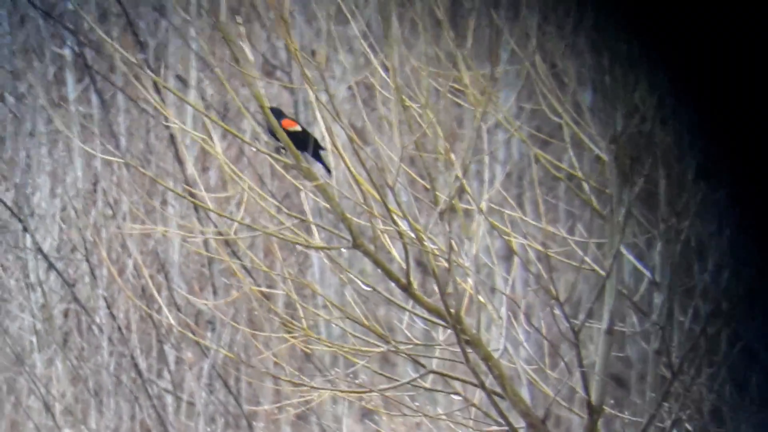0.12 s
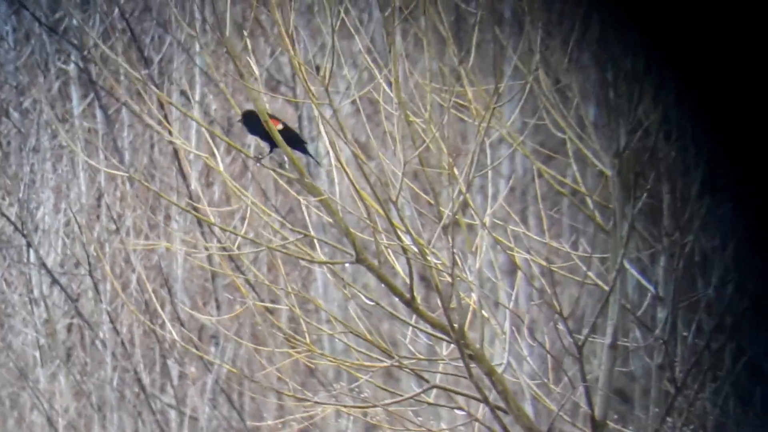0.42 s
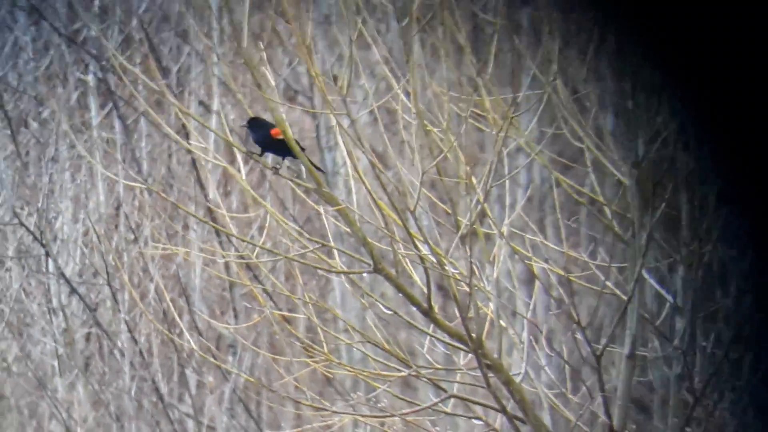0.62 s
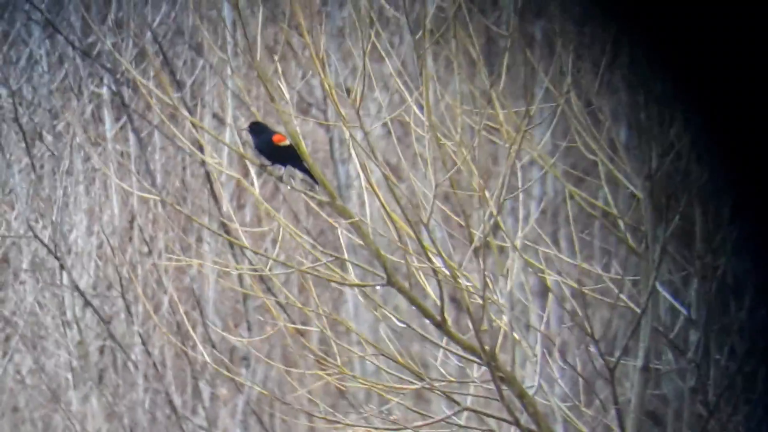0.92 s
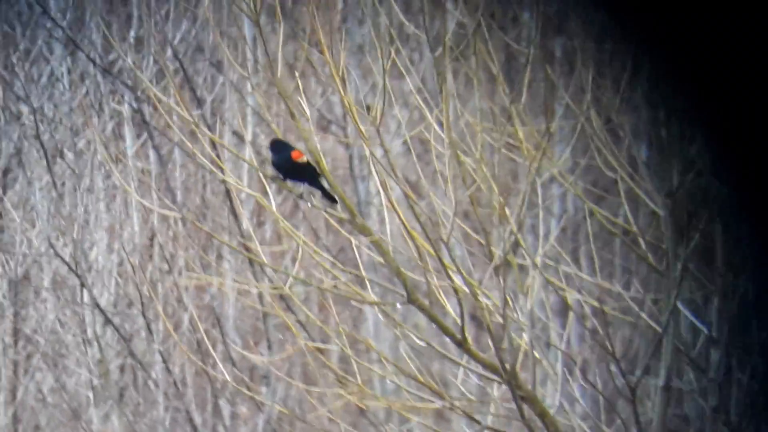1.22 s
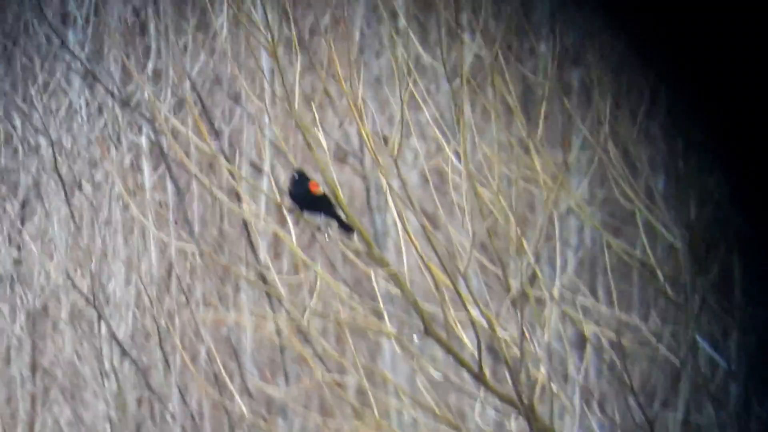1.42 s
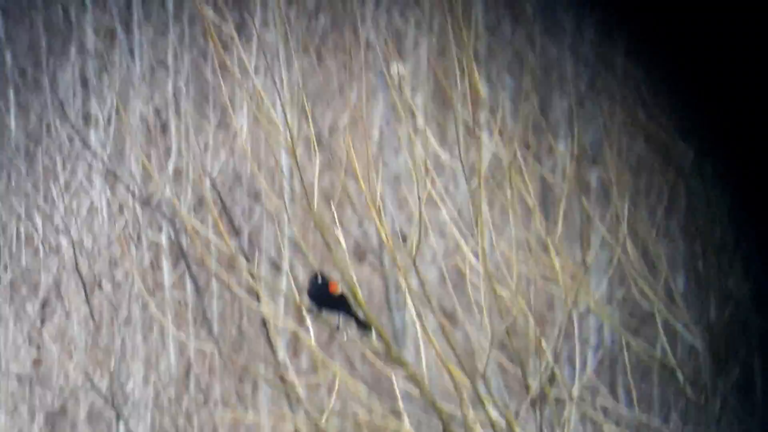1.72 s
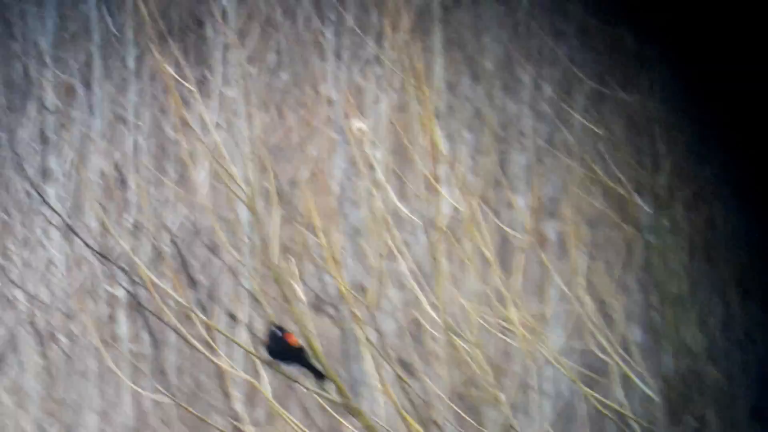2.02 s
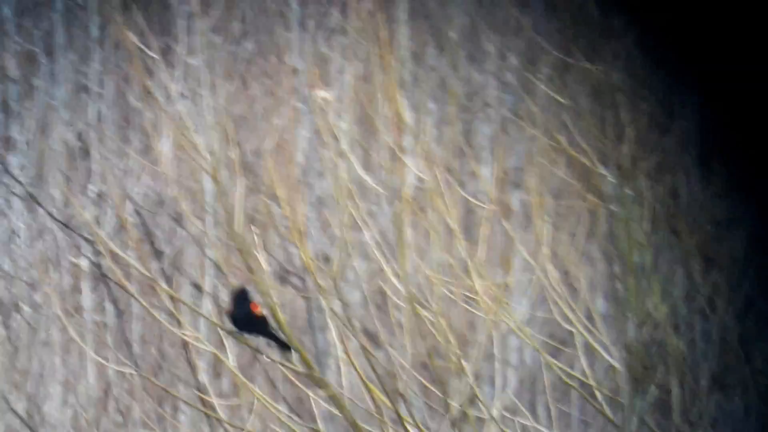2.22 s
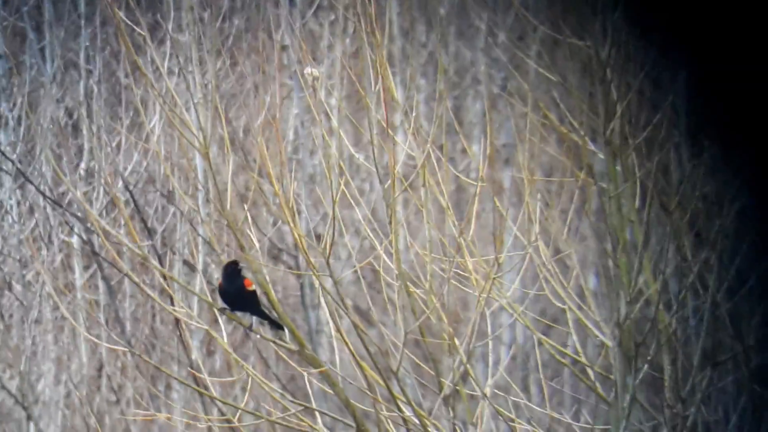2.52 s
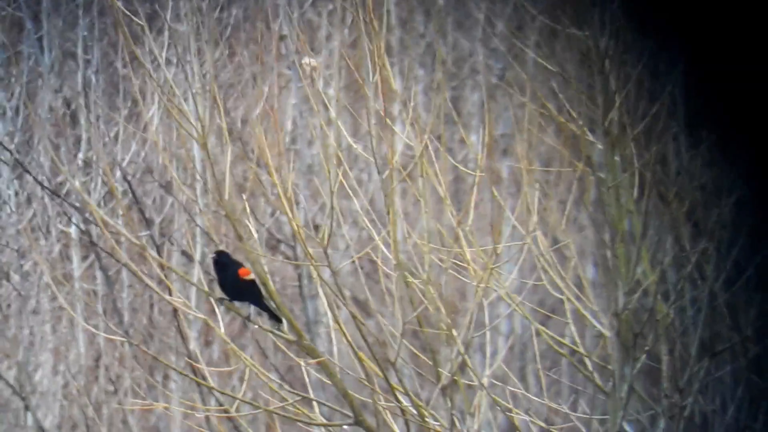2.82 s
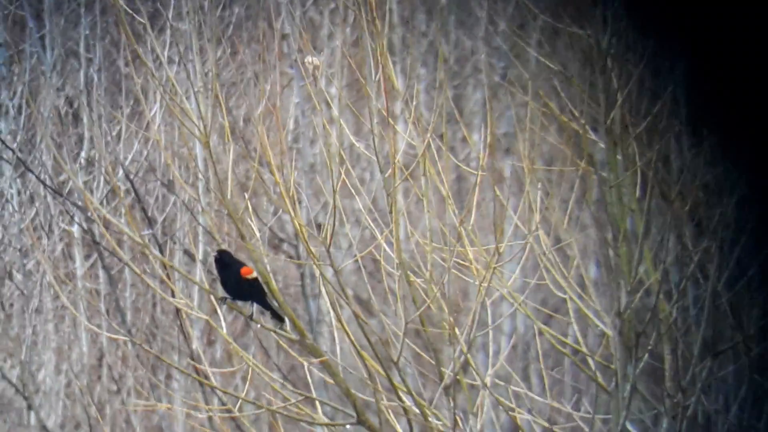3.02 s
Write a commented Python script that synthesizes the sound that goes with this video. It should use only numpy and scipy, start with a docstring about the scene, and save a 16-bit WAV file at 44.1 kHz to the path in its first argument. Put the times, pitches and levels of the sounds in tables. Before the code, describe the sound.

Marsh blackbird gives a few clipped notes, then a harsh rattling trill, amid ringing frog peeps.

```python
"""A marsh: a dense chorus of tree frogs, many short rising sine peeps near 2.8 kHz, rings on among the reeds.
A blackbird on the right sings short throbbing harmonic notes, one a buzz, then a trill of quick pitch strokes.
Small birds whistle and twitter in gliding sines, one near frog gives a low rising peep, and chips are noise
bursts, over a noise wash of far trills. Filtered noise makes a low rumble and a treble hiss underneath, and
something bumps the left microphone three times: low decaying sines with a burst of rumble."""
import sys
import numpy as np
from scipy import signal
from scipy.fft import rfft, irfft
from scipy.io import wavfile
from scipy.ndimage import uniform_filter1d

SR = 44100
rng = np.random.default_rng(int(sys.argv[2]) if len(sys.argv) > 2 else 0)


def dump_mix(stems):
    """Bounce the given channels to the path in sys.argv[1] as a 16-bit WAV at rate SR."""
    frames = np.atleast_2d(stems).T  # one column per channel
    limited = np.clip(frames, -1, 1)  # hard clip at full scale
    pcm = np.round(limited * 32767).astype(np.int16)
    wavfile.write(sys.argv[1], SR, pcm)


N = 138915
T = np.arange(N) / SR  # seconds

SONG_T60_S = 0.1  # echo decay shared by the blackbird and the small calls
FAINT_PAN_DB = -9  # left minus right, for the treble floor and the far trills


def undb(db):
    """Turn dB into an amplitude factor."""
    return 10 ** (np.asarray(db) / 20)


def curve(rows):
    """Straight lines through (seconds, value) rows."""
    return np.interp(T, *np.array(rows).T)


def colour(x, rows):
    """Filter by (Hz, dB) points, falling away past the ends."""
    hz, db = np.array(rows, float).T
    log_hz = np.log(np.arange(N // 2 + 1) * SR / N + 1)
    below = np.maximum(np.log(hz[0]) - log_hz, 0)
    above = np.maximum(log_hz - np.log(hz[-1]), 0)
    gain_db = np.interp(log_hz, np.log(hz), db) - 60 * (below + above)
    return irfft(rfft(x) * undb(gain_db), N)


def unit(x):
    """Bring the rms to 1."""
    return x / np.sqrt(np.mean(x ** 2))


def pan(x, db):
    """Place a sound by its level difference, left minus right."""
    return x * undb(np.array([[db], [-db]]) / 2)


def walk(rate):
    """Smoothed chance with about `rate` new values a second, spread 1."""
    k = int(SR / rate)
    steps = np.repeat(rng.standard_normal(N // k + 1), k)
    return unit(uniform_filter1d(uniform_filter1d(steps, k), k)[:N])


def add(out, start, x):
    """Mix x in at a time in seconds, cut at the ends."""
    i = int(start * SR)
    a, b = max(i, 0), min(i + x.shape[-1], N)
    if b > a:
        out[..., a:b] += x[..., a - i:b - i]


def phase(length, *hz):
    """Running phase of a glide through equally spaced pitches."""
    place = np.linspace(0, 1, int(length * SR))
    return 2 * np.pi * np.cumsum(np.interp(place, np.linspace(0, 1, len(hz)), hz)) / SR


def shape(x, edge):
    """Rounded attack and release, each a share `edge` of the length, with a sine's steady part lifted to rms 1."""
    u = np.linspace(0, 1, x.shape[-1])
    ramp = np.clip(np.minimum(u, 1 - u) / edge, 0, 1)
    return np.sqrt(2) * x * np.sin(np.pi / 2 * ramp) ** 2


def reeds(x, wet_db, t60):
    """Scattered echoes from reeds and branches: decaying noise, unrelated left and right."""
    t = T[:SR // 2]
    tail = rng.standard_normal((2, len(t))) * 1000 ** (-t / t60) * (t > .002)
    tail /= np.sqrt(np.sum(tail ** 2, axis=1, keepdims=True))
    return x + undb(wet_db) * signal.fftconvolve(x, tail, axes=1)[:, :N]


def air():
    """Far rumble, alike left and right in the bass, a faint treble floor and treble hiss, swelling in the trill."""
    # Colour of the rumble. Each row: frequency in Hz, relative level in dB per Hz.
    rumble_colour = [(12, -47.5), (20, -14.5), (38, -26), (64, -3), (135, -5), (219, -14), (371, -12.5),
                     (401, -16), (517, -16), (2100, -35.5), (2730, -76), (4620, -120)]
    # Swell of the bass about its mean. Each row: time in seconds, level in dB.
    bass_swell = [(0, -70.5), (.3, -61.5), (.7, -68), (1.0, -58), (1.2, -59), (1.45, -65), (1.75, -58.5),
                  (2.1, -70.5), (2.2, -62.5), (2.24, -55.5), (2.4, -68), (2.9, -63.5), (3.15, -62)]
    # Treble floor. Each row: frequency in Hz, level in dB per Hz before a 20 dB cut.
    treble_floor = [(2000, -93), (3300, -82.5), (5200, -119), (5700, -110), (7500, -118), (8500, -118)]
    # Colour of the hiss. Each row: frequency in Hz, relative level in dB per Hz.
    hiss_colour = [(4710, -30.5), (8000, -20), (9240, -11.5), (11900, -2), (13800, -3.5), (15500, -5.5)]
    # Course of the hiss. Each row: time in seconds, level in dB before a 3.5 dB lift.
    hiss_course = [(0.0, -89), (0.02, -84), (0.74, -85.5), (0.93, -81), (1.31, -83.5), (2.13, -79),
                   (2.44, -82.5), (3.14, -85), (3.15, -85)]
    rumble_db, gust_db = -57.5, 1

    alike = signal.butter(1, 146, fs=SR, output="sos")  # below 146 Hz left and right agree
    common, own = rng.standard_normal(N), rng.standard_normal((2, N))
    mixed = 1.354 * signal.sosfilt(alike, common) + own - 0.49 * signal.sosfilt(alike, own)
    low = unit(colour(mixed, rumble_colour))
    bass = signal.sosfilt(signal.butter(2, 130, fs=SR, output="sos"), low)
    swell = curve(bass_swell)
    low = low + bass * (undb(swell - swell.mean() + gust_db * walk(5.9)) - 1)

    # sqrt(SR / 2) turns white noise into level per Hz; the tenth is the 20 dB cut
    faint = colour(rng.standard_normal((2, N)), treble_floor) * np.sqrt(SR / 2) / 10
    hiss = unit(colour(rng.standard_normal((2, N)), hiss_colour))
    hiss = hiss * undb(curve(hiss_course) + 3.5 + 0.62 * walk(10))
    return pan(low, -1.5) * undb(rumble_db) + pan(faint, FAINT_PAN_DB) + pan(hiss, 0.28)


def bumps():
    """Knocks on the left: the housing rings in decaying low modes, pitch sagging after each knock."""
    # Each row: start in seconds, level in dB before a 10.5 dB lift, left minus right in dB.
    knocks = [(0.819, -34, 29), (1.628, -49.5, 45), (2.596, -50.5, 40)]
    # Ring of the housing. Each row: settled frequency in Hz, level in dB, 60 dB decay time in seconds.
    modes = [(125, 5.5, 0.098), (219.4, -13, 0.21), (366, -15, 0.17), (460, -15.5, 0.088),
             (493.5, -38, 0.17), (803, -57.5, 0.27)]
    sag, sag_s = 1.148, 0.00556  # extra pitch at the knock, as a share, and how fast it goes
    attack_s, rumble_db, rumble_t60_s = .004, -13, 0.47

    out, t = np.zeros((2, N)), T[:SR // 3]
    bent = t + sag * sag_s * (1 - np.exp(-t / sag_s))
    ring = sum(undb(db) * np.sin(2 * np.pi * hz * bent) * 1000 ** (-t / t60) for hz, db, t60 in modes)
    ring = ring * np.sin(np.pi / 2 * np.clip(t / attack_s, 0, 1)) ** 2
    for start, db, pan_db in knocks:
        rumble = colour(rng.standard_normal(N), [(25, -26), (90, 6.5), (160, -1), (300, -30)])
        rumble = unit(rumble)[:len(t)] * 1000 ** (-t / rumble_t60_s) * (1 - np.exp(-t / 0.03))
        shake = ring + undb(rumble_db) * rumble
        add(out, start - .001, shake * undb(db + 10.5 - np.array([[0], [pan_db]])))
    return out


def small_calls():
    """Gliding sine calls, twitters of rising chirps, noisy chip calls and a noise wash of far trills."""
    # Gliding whistles of small birds, and one low rising peep of a near frog (at .295 s).
    # Each row: start and length in seconds, start and end pitch in Hz, level in dB, left minus right in dB.
    glides = [(.005, 0.035, 5840, 5650, -79.5, -13), (.295, 0.087, 1396, 1594, -74, -9),
              (0.431, 0.083, 4460, 4390, -74, -12), (.39, .13, 4940, 5110, -78.5, -13),
              (0.604, .035, 4600, 4620, -80.5, -13), (0.813, 0.1, 4470, 4347, -71.5, -23),
              (0.915, 0.093, 4620, 4550, -68, -8), (1.009, 0.21, 1218, 1191, -74, -15.5),
              (1.232, .085, 4480, 4400, -64, -8), (1.295, .068, 4620, 4560, -62, -6),
              (1.42, .14, 7520, 7720, -88, -4), (2.925, 0.13, 4980, 5055, -83, -9.5),
              (3.064, 0.048, 2355, 2206, -70, -3), (1.708, 0.066, 4800, 4660, -68, 1)]
    # Each row: start in seconds, number of chirps, period in seconds, level of the third chirp in dB.
    twitters = [(.088, 6, 0.024, -65), (2.355, 7, 0.02, -61.5), (2.814, 4, .021, -68.5)]
    # Harsh calls. Each row: start and length in seconds, centre and width in Hz, level in dB.
    chips = [(0.329, 0.048, 4450, 1450, -60.5), (2.781, 0.028, 4060, 1220, -73)]
    # Far blackbird trills blurred to a wash. Each row: time in seconds, level in dB.
    wash_course = [(0, -70.5), (.1, -66), (.27, -70), (.3, -74), (.5, -76.5), (.7, -76.5), (1.2, -79),
                   (1.6, -79.5), (2.2, -66.5), (2.5, -78.5), (3.15, -84)]
    chirp_s, low_hz, high_hz = .018, 4250, 5450
    fade_db, twitter_pan_db = -4.5, -13  # fade for each chirp away from the third; left minus right

    out = np.zeros((2, N))
    for start, length, start_hz, end_hz, db, pan_db in glides:
        glide = shape(np.sin(phase(length, start_hz, end_hz)), 0.32)
        add(out, start, pan(glide * undb(db), pan_db))

    chirp = shape(np.sin(phase(chirp_s, low_hz, (low_hz + 2 * high_hz) / 3, high_hz)), 0.48)
    for start, count, period, db in twitters:
        for n in range(int(round(count))):
            add(out, start + n * period, pan(chirp * undb(db + fade_db * abs(n - 2)), twitter_pan_db))

    for start, length, hz, width, db in chips:
        band = [(hz - width, -12), (hz, 0), (hz + width / 2, -10), (hz + 2 * width, -40)]
        rasp = unit(colour(rng.standard_normal(N), band))[:int(length * SR)]
        add(out, start, pan(shape(rasp, 0.64) * undb(db), twitter_pan_db))

    wash_colour = [(3000, -23.5), (3500, 1.5), (4300, 1), (5000, 3.5), (5300, -7.5), (5600, -15.5)]
    wash = unit(colour(rng.standard_normal((2, N)), wash_colour)) * undb(curve(wash_course) + walk(40))
    return reeds(out, -10.5, SONG_T60_S) + pan(wash, FAINT_PAN_DB)


def frogs():
    """Many short sine peeps, each rising in pitch, at random times, pitches and places, ringing in the reeds."""
    # Course of the evened-out chorus. Each row: time in seconds, level in dB before a 3 dB lift.
    chorus_course = [(0.0, -55.5), (0.03, -55.5), (0.4, -51), (0.66, -55), (0.67, -51), (1.13, -52.5),
                     (1.15, -56), (1.24, -47), (1.26, -55), (1.37, -50), (1.64, -53.5), (1.75, -49.5),
                     (1.94, -54.5), (2.08, -46), (2.19, -52), (2.24, -49.5), (2.44, -55), (2.6, -50.5),
                     (2.74, -54), (2.78, -47.5), (2.8, -49.5), (2.96, -55), (3.11, -52.5), (3.15, -54)]
    count, peep_s, rise_hz_per_s, scatter_db = 600, .12, 2000, 3
    common_hz, spread_hz = 2819.6, 130
    edge_hz, edge_db = -20.25, -1  # frogs far from the common pitch lean lower and are fainter

    out = np.zeros((2, N))
    for n, (a, b, c, d, e) in enumerate(rng.standard_normal((count, 5))):
        length = peep_s * np.exp(.2 * a)
        hz = common_hz + spread_hz * b + edge_hz * b ** 2
        half_rise = rise_hz_per_s * length / 2
        ph = phase(length, hz - half_rise, hz + half_rise)
        # place e sets both the phase and the level between left and right
        peep = shape(np.array([np.sin(ph), np.sin(ph + 2.42 * e)]), 0.23)
        peep = peep * undb(scatter_db * c + edge_db * b ** 2) * undb(1.8 * e * np.array([[1], [-1]]))
        start = (n + 5 * d) / count * (T[-1] + 0.51) - .3
        add(out, start, peep)
    out = reeds(out, 4, 0.73)
    out = out / np.sqrt(uniform_filter1d(np.mean(out ** 2, axis=0), SR // 8))  # even out the level
    return pan(out, -6) * undb(curve(chorus_course) + 3.0)


def song_notes():
    """Harmonic notes whose voice is chopped by a second membrane and roughened by fast chance."""
    # Each row: start and length in seconds, start, middle and end pitch in Hz, level at the end before
    # overtones, throb and colour in dB, throb rate in Hz, throb depth 0-1.
    notes = [(1.197, 0.043, 1510, 1850, 1580, -49.5, 100, 0.2),
             (1.344, 0.054, 2318, 2187, 2257, -55, 97.5, 1),
             (1.432, .150, 1694, 1695, 1697, -46, 199.5, .7),
             (1.435, 0.14, 1510, 1552, 1594, -64, 96.4, 0.38),
             (1.598, .026, 1950, 1900, 1830, -54.5, 100, .1),
             (1.632, 0.024, 1600, 1656, 1745, -35, 100, 0.2)]
    # One row per note: levels of multiples 1, 2, 3 and 4 of its pitch in dB.
    overtones = [(-24.5, -1.5, -14, -23), (15.5, -20, -2, -30), (-8, -5, -3, -7), (19.5, -35, -34, -34),
                 (26.5, -45, -4, -34), (-39, -7, -22, -13)]
    swell_db, rasp_db, waver = 10.5, -4, .004  # rise over the note, roughness, pitch waver as a share

    out = np.zeros(N)
    for (start, length, a, b, c, db, throb_hz, depth), tones in zip(notes, overtones):
        ph = phase(length, a, (a + 2 * b) / 3, b, (c + 2 * b) / 3, c)
        ph = ph + waver * np.cumsum(walk(150)[:len(ph)] * np.gradient(ph))
        voice = sum(undb(g) * np.exp(1j * (k + 1) * ph) for k, g in enumerate(tones))
        # the throb's side lines all lie below each overtone
        beat = np.exp(-1j * phase(length, throb_hz, throb_hz))
        side = depth * beat / (1 - 0.67 * beat)
        rasp = depth * undb(rasp_db) * walk(1500)[:len(ph)]
        note = shape((voice * (1 + side + rasp)).imag, 0.18)
        add(out, start, note * undb(db + swell_db * np.linspace(-1, 0, len(ph))))
    return out


def stroke(pitch, up_s):
    """One trill stroke: a sweep up in pitch, fainter, and a steeper one down."""
    top_hz, up_hz_per_s, down_hz_per_s, down_s = 5800, 4e5, 8e5, .0045
    t = np.arange(-up_s, down_s, 1 / SR)
    hz = top_hz * pitch + np.where(t < 0, up_hz_per_s, -down_hz_per_s) * t
    hz = uniform_filter1d(hz, size=40)  # round the peak
    sweep = shape(np.sin(2 * np.pi * np.cumsum(hz) / SR), 0.32)
    return undb(np.interp(t, [-.001, .001], [-5, 0])) * sweep


def song_trill():
    """Syllables of a few fading strokes over a noise rasp, the first ones closer together."""
    # Strokes of one syllable. Each row: delay in seconds, share of the top pitch, level in dB.
    strokes = [(0, 1, 0), (.005, .88, -4), (.0095, .88, -11), (.014, .8, -12)]
    # Course of the trill before colour. Each row: time in seconds, level in dB.
    trill_course = [(1.65, -43), (1.70, -39), (1.9, -38.5), (2.1, -39.5), (2.17, -42.5), (2.21, -43)]
    start_s, count, period_s = 1.661, 27, .0208
    hurry_s, settle = .018, 3.6  # total time gained early on; syllables it takes to settle
    up_s, scatter_db, rasp_db = .004, 1.2, -3.5

    trill = np.zeros(N)
    for n, chance in enumerate(rng.standard_normal((count, len(strokes), 3))):
        start = start_s + n * period_s - hurry_s * (1 - np.exp(-n / settle)) - up_s
        for (delay, pitch, db), (a, b, c) in zip(strokes, chance):
            sweep = stroke(pitch + .012 * a, up_s) * undb(db + scatter_db * b)
            add(trill, start + delay * (1 + 0.066 * c), sweep)
    length = count * period_s - hurry_s
    rasp = shape(rng.standard_normal(int(length * SR)), .03)
    add(trill, start_s - .01, rasp * undb(rasp_db))
    return trill * undb(curve(trill_course))


def blackbird():
    """Notes and trill coloured for each microphone, with short echoes."""
    # Colour at the right microphone. Each row: frequency in Hz, gain in dB.
    right_colour = [(1200, -19.5), (1900, -24.5), (2300, -12), (2800, 8), (3250, -8.5), (3500, -5.5),
                    (4100, -4), (4270, -13), (4500, -3), (5000, 2), (5600, -3.5), (6100, -32),
                    (6500, -25.5), (6900, -32), (7250, -74), (7500, -40), (8500, -62)]
    # Left minus right. Each row: frequency in Hz, difference in dB.
    left_difference = [(1200, -10), (2200, -2.5), (3600, -20), (4500, -27.5), (5000, -24.5), (5500, -24),
                       (6600, 3), (8500, -1)]
    right = colour(song_notes() + song_trill(), right_colour)
    left = colour(right, left_difference)
    return reeds(np.array([left, right]), -12, SONG_T60_S)


def scene():
    """The marsh, summed from the background to the song."""
    return air() + bumps() + small_calls() + frogs() + blackbird()


def record(dry):
    """The recorder cuts the top steeply above 15640 Hz."""
    return signal.sosfilt(signal.ellip(10, .2, 70, 15640, fs=SR, output="sos"), dry)


dry = scene()
out = record(dry)
dump_mix(out)
```